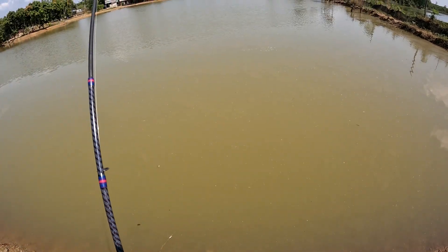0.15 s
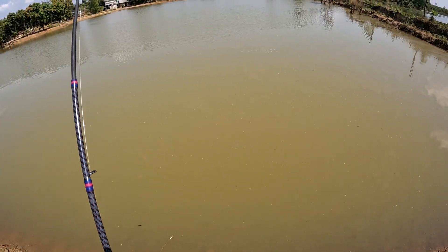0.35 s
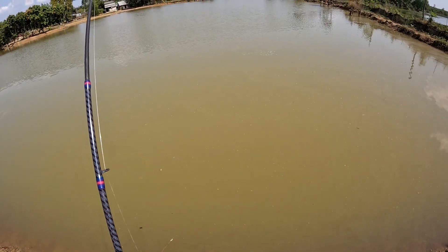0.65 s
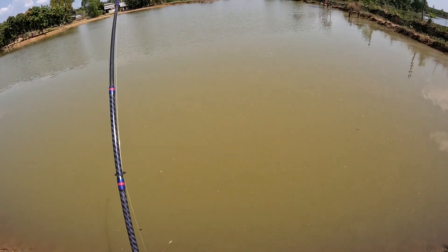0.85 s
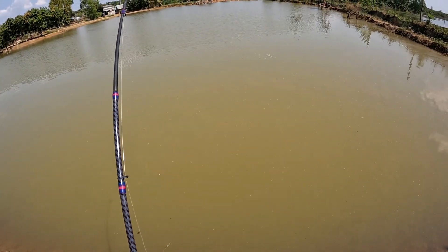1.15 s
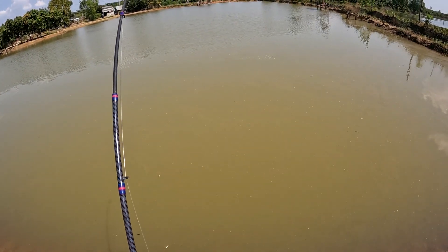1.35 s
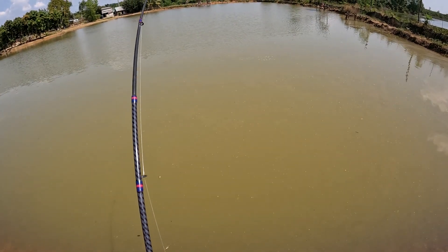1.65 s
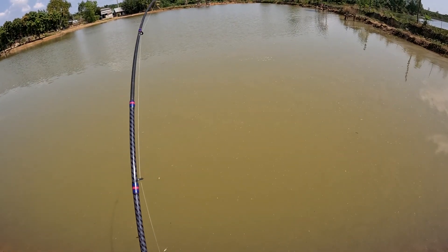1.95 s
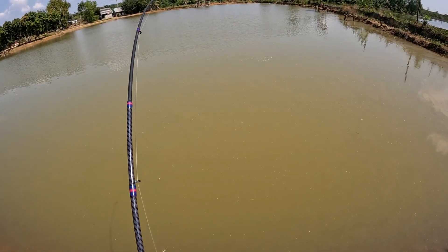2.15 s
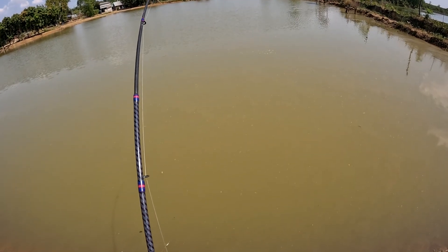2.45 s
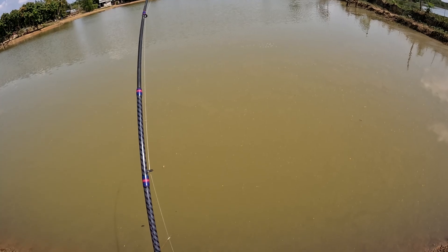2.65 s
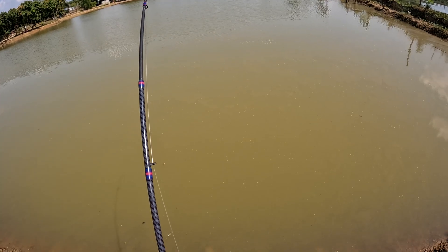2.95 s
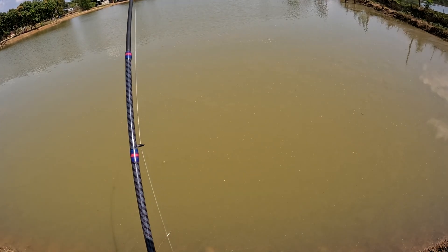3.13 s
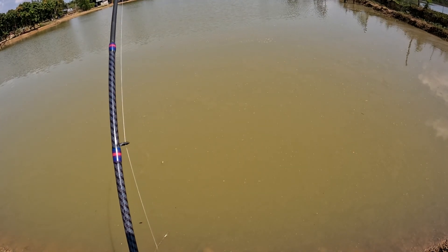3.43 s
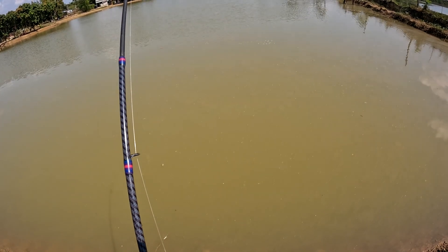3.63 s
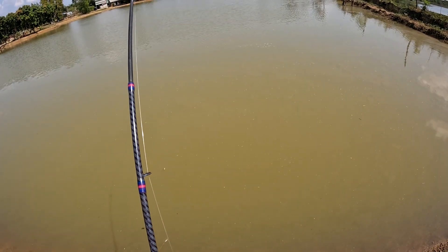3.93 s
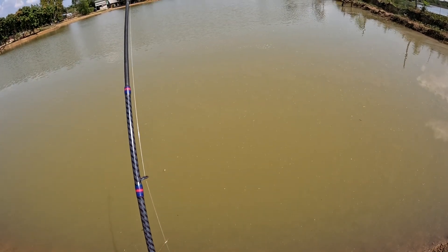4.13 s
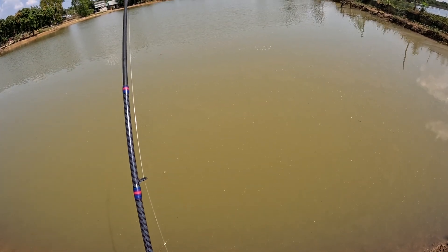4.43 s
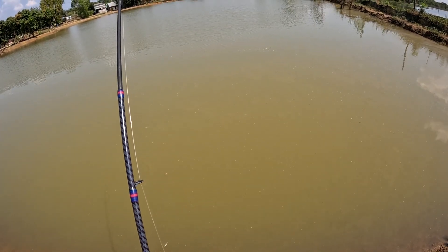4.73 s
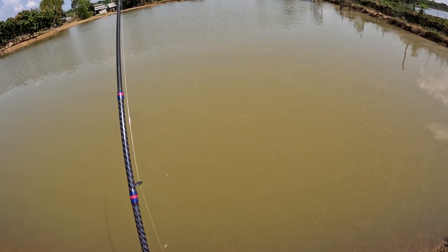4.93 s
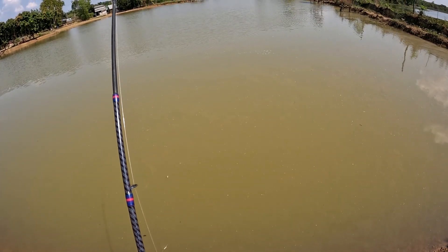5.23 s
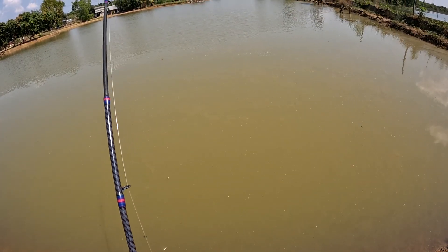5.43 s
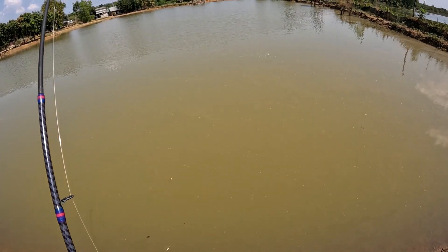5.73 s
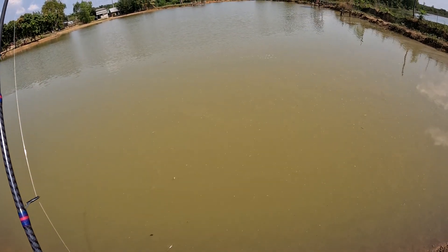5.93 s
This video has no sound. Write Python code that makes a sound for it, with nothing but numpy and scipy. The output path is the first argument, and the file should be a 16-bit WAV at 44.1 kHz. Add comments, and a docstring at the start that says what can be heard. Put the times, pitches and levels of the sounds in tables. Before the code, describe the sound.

Bright tinkling of a rod-tip bite bell, light knocks on the rod, sparse dry reel clicks, then low thudding wind over quiet outdoor hiss.

```python
"""By a still pond a rod is held close to two microphone ports. A pellet rattles in the little bite-alarm bell on
the rod: every blow restarts decaying shell modes under dry contact ticks. The reel's drag pawl snaps over a dozen
teeth and fittings knock on the blank, both as clicks through resonances. A breeze that grows to a gust buffets
the ports, as shaped noise and short pressure eddies, over a far hiss and one rub of the grip.
The stereo image opens slowly from near mono."""
import sys
import numpy as np
from scipy import signal
from scipy.io import wavfile
from scipy.ndimage import uniform_filter1d

SR = 44100
rng = np.random.default_rng(int(sys.argv[2]) if len(sys.argv) > 2 else 0)


def generate_wav(signal):
    """Clip the signal to [-1, 1] and save it as 16-bit WAV at the path in sys.argv[1]."""
    frames = np.transpose(np.atleast_2d(signal))
    scaled = np.clip(frames, -1, 1) * 32767
    pcm = np.round(scaled).astype(np.int16)
    wavfile.write(sys.argv[1], SR, pcm)


N = 268083


def amp(db):
    """Amplitude factor of a level in dB."""
    return 10 ** (np.asarray(db) / 20)


def evened(x):
    """Scales x to rms 1."""
    return x / np.sqrt(np.mean(x ** 2) + 1e-20)


def columns(rows):
    """Every column after the time, interpolated to one value a sample."""
    s, *values = np.transpose(rows)
    return [np.interp(np.arange(N) / SR, s, v) for v in values]


def sides(pan_db):
    """Left and right gain for a level gap; positive leans left."""
    return amp([pan_db / 2, -pan_db / 2])


def ring(x, modes):
    """Passes x through resonances of (f/Hz, width/Hz, level/dB), each applied twice for steep flanks."""
    out = 0
    for hz, width_hz, db in modes:
        pole = np.exp((2j * np.pi * hz - np.pi * width_hz) / SR)
        resonance = signal.lfilter([1], np.poly([pole, pole]), x).real
        out = out + amp(db) * (1 - abs(pole)) ** 2 * resonance
    return out


def struck(modes):
    """Reply of the resonances to one click, peak 1."""
    reply = ring(signal.unit_impulse(4096), modes)
    return reply / abs(reply).max()


def train(s, db):
    """Single-sample clicks of the given levels at the given moments."""
    out = np.zeros(N)
    at = np.minimum(np.round(np.asarray(s) * SR).astype(int), N - 1)
    np.add.at(out, at, amp(db))
    return out


def noise(spectrum, same, patchy_db, size):
    """Two-channel noise of rms 1 with drifting patches; same is the left-right likeness."""
    hz, frames = np.fft.rfftfreq(size, 1 / SR), 4 * N // size + 6
    a, b, c, d, patch = rng.standard_normal((frames, len(hz), 5)).T
    patch = uniform_filter1d(uniform_filter1d(patch, 9, axis=0), 7, axis=1)
    patch = evened(patch)
    f_hz, db = np.transpose(spectrum)
    spectrum_db = np.interp(np.log(hz + 1), np.log(f_hz), db)
    same = np.clip(same, 0, 1)
    left, other = a + 1j * b, c + 1j * d
    z = np.array([left, same * left + np.sqrt(1 - same ** 2) * other])
    z *= amp(spectrum_db[:, None] + patchy_db * patch)
    return evened(signal.istft(z, nperseg=size, noverlap=3 * size // 4)[1][:, :N])


def bell():
    """Each blow stops the old ring and starts a new one; between blows the pellet chatters ever more softly."""
    # shell modes of the main, lower and high family: f/Hz, level in family/dB, t60 before the settling/s
    shell = [
        [(4207, 1.5, 0.27), (4320, -15.5, 0.083), (4140, -8, 0.12)],
        [(3950, 4, 0.12), (3820, 5, .16), (7974, -19.5, 0.13)],
        [(9907, -2.5, 0.16), (9755, -8.5, 0.17), (14150, -11, 0.07)],
    ]
    # dry contact resonances: f/Hz, width of each pass/Hz, relative level/dB
    tick = [(4420, 1740, 31), (5500, 1000, -9.5), (8430, 5600, 3), (12600, 1200, -44)]
    # light-bounce resonances: f/Hz, width of each pass/Hz, relative level/dB
    jingle = [(4210, 39, 17.5), (3690, 430, 13.5), (4690, 1650, -0.5), (5500, 2090, -13.5), (9900, 40, -6)]
    # ring against blow strength as the bell turns and is gripped: t/s, two low families/dB, high family/dB
    ring_balance = [(0, -5, -44), (0.55, -11, -44), (0.87, -6.5, -29.5), (1.7, -8.5, -26), (2.3, -7, -20),
                    (2.9, -8, -19.5), (3.8, -11.5, -21.5), (4.2, -7, -22.5), (4.9, -14, -24),
                    (5.3, -18, -28), (5.7, -16, -34)]
    s, tick_db, lean_db, *chance = all_blows()
    main_share = 1 / (1 + amp(-2 * lean_db))  # of the power in the two low families
    balance_s, *balance_db = np.transpose(ring_balance)
    low_db, high_db = (tick_db + np.interp(s, balance_s, v) for v in balance_db)
    family_db = [low_db + 10 * np.log10(main_share), low_db + 10 * np.log10(1 - main_share), high_db]
    draws = np.reshape(chance, (3, 3, 3, -1))  # family, kind of chance, mode, blow
    t = np.arange(N) / SR
    last = np.maximum(np.searchsorted(s, t) - 1, 0)
    since = np.maximum(t - s[last], 0)
    contact = np.hanning(90) / np.hanning(90).sum()  # 2 ms hand-over between rings

    out = np.zeros((2, N))
    for modes, level_db, (phase, spot, load) in zip(shell, family_db, draws):
        for (hz, db, t60_s), p, q, r in zip(modes, phase, spot, load):
            fade = amp(-60 * since / t60_s - 1000 * since ** 2)  # settling pellet damps more and more
            # each blow lands on another spot
            start = amp(db + level_db + 14.9 * (q - .5)) * np.exp(2j * np.pi * 0.49 * p)
            detune = np.exp(2j * np.pi * hz * 0.013 * (r - .5)[last] * since)  # pellet loads the shell
            swing = signal.oaconvolve(start[last] * fade * detune, contact, "same")
            tone = (swing * np.exp(2j * np.pi * hz * t)).real
            out += sides(0.00062 * hz)[:, None] * tone

    bounce = (rng.random(N) < 1400 / SR) * rng.choice([-1, 1], N)  # 1400 a second on average
    rolling = amp(tick_db[last] - 21 - 380 * since) + amp(-84.5)  # never quite still
    chatter = bounce * rolling * amp(5.1 * np.minimum(rng.exponential(1, N), 4))
    skid = 0
    for late_s, db in ((0, -0.5), (.0008, -8), (.002, -18.5)):
        skid = skid + train(s + late_s * rng.random(len(s)), tick_db + db)
    scrape = amp(-10) * rolling * rng.standard_normal(N)  # fine spray of metal sliding on metal
    ticks = signal.oaconvolve(skid + scrape, struck(tick))[:N]
    ticks = ticks + signal.oaconvolve(chatter, struck(jingle))[:N]
    small = signal.cheby2(8, 40, 3450, "high", fs=SR, output="sos")  # too small to radiate lows
    return signal.sosfilt(small, out + sides(4.2)[:, None] * ticks)


def all_blows():
    """Clear blows, light random ones and rests in time order: moment, strength, lean and draws of chance."""
    # clear pellet blows: t/s, strength/dB, lean of the ring to the main family over the lower one/dB
    blows = [(0.0009, -35, 13), (0.042, -32, -17), (0.0573, -34.5, -12), (0.108, -31.5, 6),
             (0.1464, -30, 6), (0.1623, -31, 9), (0.199, -30, -21), (0.2223, -34.5, 13), (0.26, -40, -4),
             (0.3, -44.5, 26), (0.3843, -47, 9), (0.4126, -45.5, -4), (0.5125, -46, -13),
             (0.815, -48.5, 16), (0.8508, -38.5, 1), (0.8719, -27.5, 1), (0.8898, -35.5, -2),
             (0.905, -39, 10), (0.9418, -25, 30), (0.9894, -33.5, 16), (1.081, -37.5, 26),
             (1.107, -42.5, 14), (1.2225, -22, 0), (1.2356, -26.5, -1), (1.255, -34.5, -8),
             (1.377, -47.5, 25), (1.5064, -35.5, -3), (1.573, -46, -18), (1.655, -41, 6), (1.718, -31, 5),
             (1.7365, -36, 2), (1.8203, -38, -1), (1.8564, -31, 16), (1.8753, -34, 9), (1.9165, -29.5, 1),
             (1.942, -31.5, 1), (1.978, -33.5, -14), (1.9926, -27.5, 7), (2.043, -27.5, 8),
             (2.068, -35.5, -2), (2.112, -43.5, 18), (2.1715, -37.5, 8), (2.24, -35, 20), (2.333, -34, -2),
             (2.3822, -35, 4), (2.4323, -42.5, -3), (2.502, -37, 12), (2.646, -42, 18), (2.6867, -37, 18),
             (2.7236, -38, 14), (2.75, -31, -8), (2.784, -39.5, -3), (2.8214, -38, -8), (2.8366, -36, 20),
             (2.859, -37.5, 26), (2.8888, -46.5, 22), (3.029, -47, 18), (3.0494, -38.5, 3),
             (3.19, -44.5, 14), (3.223, -45.5, -2), (3.428, -42, -15), (3.815, -42.5, -3),
             (3.9288, -45, -14), (4.135, -23.5, -1.5), (4.1539, -27, -7), (4.1667, -18.5, 12),
             (4.1915, -33, 5), (4.2159, -25.5, 24), (4.2387, -30.5, 10), (4.2768, -21.5, -8),
             (4.309, -32, 19), (4.322, -28, 10), (4.353, -21, -3), (4.368, -28, -19), (4.3836, -30, 28),
             (4.42, -24, 7), (4.4347, -23.5, 18), (4.462, -26.5, 3), (4.476, -35, -12), (4.531, -35.5, 17),
             (4.7346, -36, 6), (4.8, -48, 8), (5.003, -46, -14), (5.1605, -52, -20), (5.308, -53.5, -17),
             (5.452, -46, 7), (5.5286, -41, -3), (5.6402, -45, -2), (5.6573, -47.5, 2)]
    # spells of shaking, filled with light blows: start/s, end/s, mean strength/dB
    shakes = [(0.06, 0.28, -39.5), (0.35, 0.46, -45), (0.76, 0.841, -50.5), (0.95, 1.02, -52.5),
              (1.42, 1.66, -59.5), (1.83, 2.1, -37.5), (2.18, 2.26, -39.5), (2.39, 2.52, -46.5),
              (2.61, 2.76, -51.5), (3.06, 3.95, -60), (4.05, 4.12, -54), (4.17, 4.498, -35),
              (4.74, 5.02, -53.5), (5.15, 5.33, -53), (5.44, 5.48, -46), (5.51, 5.56, -49),
              (5.58, 5.68, -48)]
    # the pellet lies down and stills the shell: t/s
    rest_times = [0.321, 0.972, 1.1545, 1.6895, 2.527]
    rest_db = -86  # what a resting pellet leaves
    light_per_s, flight_s = 60, .008  # no light blow within a flight of a clear one
    clear, count = np.array(blows), 400
    when, size, lean, keep = rng.random((count, 4)).T
    when = when * N / SR
    shake_db = np.full(count, -np.inf)
    for start, end, db in shakes:
        shake_db[(when > start) & (when < end)] = db
    flown = abs(when[:, None] - clear[:, 0]).min(axis=1) > flight_s
    kept = np.isfinite(shake_db) & flown & (keep < light_per_s * N / SR / count)
    # strength spreads +-6 dB, lean +-26 dB
    light = np.transpose([when, shake_db + 3.0 * (4 * size - 2), 13 * (4 * lean - 2)])
    rests = [(s, rest_db, 0) for s in rest_times]
    rows = np.vstack([light, clear, rests])
    rows = np.hstack([rows, rng.random((len(rows), 27))])
    rows = rows[np.r_[kept, np.ones(len(rows) - count, bool)]]
    return rows[np.argsort(rows[:, 0])].T


def drag():
    """The pawl slides off a tooth and lands: a thin bright snap, left port first, and a duller middle body."""
    # pawl snaps: start of the slide t/s, treble level/dB, body against the treble/dB
    snaps = [(4.4528, -22, -11), (4.472, -21, -10), (4.5183, -21, -8.5), (4.559, -23.5, -8),
             (4.6302, -23.5, -10), (5.0313, -25.5, -4.5), (5.0522, -27, -1), (5.2087, -26, -6.5),
             (5.231, -24, -7), (5.2572, -24.5, -6), (5.3484, -26, -3.5), (5.4364, -29.5, -3)]
    # treble resonances: f/Hz, width of each pass/Hz, relative level/dB
    pawl_treble = [(10230, 3300, 25), (12000, 2900, 16), (7870, 1800, 22), (15300, 530, -7)]
    # body resonances: f/Hz, width of each pass/Hz, relative level/dB
    pawl_body = [(4770, 1680, 12.5), (3620, 1100, 3), (2310, 240, 2.5)]
    s, db, body_db = np.transpose(snaps)
    slide_s = .0005
    # softer scrape, landing, rebound
    clicks = train(s + slide_s, db - 27) + train(s + 2 * slide_s, db) + train(s + 3.4 * slide_s, db - 38)
    treble = signal.oaconvolve(clicks, struck(pawl_treble))[:N]
    body = signal.oaconvolve(train(s + 2 * slide_s, db + body_db), struck(pawl_body))[:N]
    snap = np.array([treble, np.roll(treble, shift=1)])  # right port one sample later
    return sides(9.8)[:, None] * snap + sides(1.6)[:, None] * body


def knocks():
    """Short dead rings of the hollow blank, a second mode above and a crack on top."""
    # knocks on the rod: t/s, peak level before panning/dB, pitch f/Hz, bright crack/dB (9 dB taken off below)
    knock_rows = [(0.168, -44, 2300, -20), (0.2711, -39.5, 2970, 0), (0.8484, -35.5, 2180, 3),
                  (1.81, -46, 2850, -20), (3.0529, -31, 1910, -34), (3.5425, -47.5, 1390, -14),
                  (3.7602, -32.5, 2920, -22), (3.7806, -26.5, 3340, 2), (3.8826, -44, 3400, -7),
                  (3.9801, -43, 1265, -19), (4.244, -44.5, 1310, -26), (4.273, -39.5, 1140, -2.5),
                  (4.5353, -29, 1370, -26), (5.989, -39.5, 2360, -7)]
    out = np.zeros(N + SR)
    for s, db, hz, crack_db in knock_rows:
        at = round(s * SR)
        modes = [(hz, 0.29 * hz, 0), (1.463 * hz, 0.43 * hz, -6), (7000, 4000, crack_db - 9)]
        out[at:at + 4096] += amp(db) * struck(modes)
    return sides(4.2)[:, None] * out[:N]


def wind():
    """Slow rumble, lumpy flutter and buffets of turbulent pressure; the gust falls harder on the right port."""
    # wind on the ports, before panning: t/s, rumble level/dB, flutter level/dB
    wind_levels = [(0, -43.5, -55), (1.1, -45, -55.5), (2.3, -40, -55), (2.7, -47, -54.5),
                   (3.1, -34.5, -52), (3.55, -46.5, -55), (4.2, -38.5, -54.5), (4.75, -45, -52.5),
                   (4.95, -41, -54.5), (5.1, -22.5, -43), (5.19, -33, -46), (5.33, -29, -47),
                   (5.6, -24.5, -43.5), (5.72, -24.5, -37.5), (5.79, -16.5, -22.5), (5.88, -29, -23),
                   (6.0, -19, -20.5), (6.08, -30, -22.5)]
    # single buffets: t/s, level/dB (5 dB taken off below), pitch f/Hz, sharp edge/dB
    buffets = [(5.102, -16.5, 88, -40), (5.241, -7, 83.6, -62), (5.304, -24, 89, -60),
               (5.36, -25.5, 99.5, -60), (5.439, -20.5, 105, -71), (5.505, -24, 104.4, -60),
               (5.56, -17, 122.6, -63), (5.641, -26.5, 137, -65), (5.675, -16.5, 147, -66),
               (5.707, -12.5, 155.3, -65), (5.76, -10.5, 168.6, -56), (5.824, -7.5, 140, -10),
               (5.884, -8.5, 147.7, -24), (5.92, -20, 136, -32), (5.986, -9.5, 227, -39.5),
               (6.008, -7.5, 161, -19.5), (6.044, -7, 230, -26.5)]
    # rumble spectrum: f/Hz, relative level/dB per Hz
    rumble = [(12, 7.5), (22, 13), (45, 3.5), (80, -4.5), (140, -49), (400, -100)]
    # calm flutter spectrum: f/Hz, relative level/dB per Hz
    flutter = [(50, -6.5), (90, 3), (180, -4), (320, -14), (480, -27.5), (1500, -100)]
    # gust flutter spectrum: f/Hz, relative level/dB per Hz
    gust_flutter = [(60, -23.5), (100, 1.5), (160, 3.5), (250, -13.5), (420, -36), (1200, -100)]
    port_lag_s = .00027  # a buffet reaches the right port later
    rumble_db, flutter_db = columns(wind_levels)
    gust = np.clip((flutter_db + 55.5) / 12, 0, 1)  # 0 calm, 1 full gust
    out = 0
    # in the gust the ports' rumble is less alike, their flutter more
    for soft, hard, db, pan_db, same in ((rumble, rumble, rumble_db, -4, .75),
                                         (flutter, gust_flutter, flutter_db, -8, .93)):
        calm = noise(soft, 0.86, 2.3, size=2048)
        gusty = noise(hard, same, 3.63, size=2048)
        mix = np.sqrt(1 - gust) * calm + np.sqrt(gust) * gusty
        out = out + sides(pan_db * (.3 + 0.63 * gust)) * amp(db) * mix

    puffs = np.zeros((2, N + SR))
    for s, db, hz, edge_db in buffets:
        # smaller eddies ride on the crest and give the edge: pitch ratio, delay/cycles, level/dB, pan/dB
        for ratio, late, size_db, pan_db in ((1, 0, 0, -7), (2.1, 0, 0.38 * edge_db, -10),
                                             (3.6, 1.24, edge_db, -10), (5.6, 2.3, edge_db - 21, -3.5)):
            part = amp(db - 5.0 + size_db) * sides(pan_db)[:, None] * eddy(ratio * hz, 1.146)
            puffs[:, round((s + late / hz) * SR):][:, :part.shape[1]] += part
    lagged = np.roll(puffs[1], round(port_lag_s * SR))
    return out + np.array([puffs[0], lagged])[:, :N]


def eddy(hz, turns_to_peak):
    """A few swelling and dying cycles of pressure."""
    turns = np.arange(0, 7 * turns_to_peak, hz / SR)
    envelope = (turns / turns_to_peak * np.exp(1 - turns / turns_to_peak)) ** 2
    return envelope * np.sin(2 * np.pi * turns)


def air():
    """Far hiss of the open pond with its faint swells, and the hand's brief rub, all as shaped noise."""
    # far outdoor hiss spectrum: f/Hz, relative level/dB per Hz
    hiss = [(250, -51.5), (500, -9.5), (900, -9), (1290, -4.5), (1900, -11.5), (3200, -12.5), (4500, -17.5),
            (7500, -22.5), (9000, -27.5), (12500, -64)]
    # grip resonances: f/Hz, width of each pass/Hz, relative level/dB
    grip = [(305, 45, 11), (714, 180, 5.5), (1550, 390, 4.5), (2850, 1800, -5.5)]
    # faint bands, mostly sinking: start/s, length/s, first f/Hz, last f/Hz, width setting/Hz, level before arch/dB
    swells = [(0.0, 0.25, 1156, 1126, 90, -67), (0.198, 0.91, 1348, 1190, 112, -67),
              (1.299, 0.45, 1306, 1305, 150, -70.5), (1.35, 0.11, 1500, 1503, 2500, -66),
              (1.495, 0.12, 1720, 1690, 70, -70), (1.741, 0.3, 1346, 1220, 130, -64.5),
              (1.798, 0.098, 1660, 1720, 80, -65.5), (2.168, 0.2, 1724, 1800, 150, -72),
              (2.902, 0.74, 1352, 1249, 405, -69.5), (4.901, 0.42, 1500, 1396, 1200, -68.5),
              (5.62, 0.15, 1294, 1265, 70, -66), (5.582, 0.22, 696, 717, 50, -70.5),
              (5.8, 0.08, 3200, 3000, 3000, -68), (5.96, 0.11, 3000, 2600, 3000, -62)]
    rub_s, rub_rise_s, rub_fall_s, rub_db = 4.656, 0.13, 0.078, -51.5  # a hand slides on the grip
    late_s = np.arange(N) / SR - rub_s
    stroke = np.clip(1 + np.minimum(late_s / rub_rise_s, -late_s / rub_fall_s), 0, 1)
    out = amp(rub_db) * stroke * evened(ring(rng.standard_normal(N), grip))
    for row in swells:
        part = swell(*row)
        out[round(row[0] * SR):][:len(part)] += part
    return amp(-65) * noise(hiss, 0.37, 2.5, size=512) + out


def swell(start, length, first_hz, last_hz, width_hz, db):
    """Noise through a gliding resonance under one smooth arch."""
    u = np.arange(0, 1, 1 / (length * SR))
    turn = np.cumsum(first_hz + (last_hz - first_hz) * u) / SR
    slow = ring(rng.standard_normal((2, len(u))), [(0, width_hz, 0)])
    band = slow[0] * np.cos(2 * np.pi * turn) + slow[1] * np.sin(2 * np.pi * turn)
    return amp(db) * np.sin(np.pi * u) * evened(band)


def body_echo(x):
    """Sparse reflections from the angler's hands and chest, gone in a few hundredths of a second."""
    fade = amp(-60 * np.arange(3000) / SR / 0.063)  # t60 63 ms
    taps = rng.standard_normal((2, 3000)) * (rng.random((2, 3000)) < .1) * fade
    return signal.oaconvolve(x, taps / np.linalg.norm(taps[0]), axes=1)[:, :N]


def scene():
    """Bell, drag and knocks with their body echoes, over wind and air."""
    hard = drag() + knocks()
    small = bell()
    near = small + amp(-17.5) * body_echo(small) + hard + amp(-9) * body_echo(hard)
    return near + wind() + air()


def record(dry):
    """The stereo image opens; the amplifier rounds off the hardest buffets; then the band limit."""
    open_from_s, open_by_s = 0.62, 4.83
    shut, shut_treble, treble_hz = 0.024, 0.51, 6140  # side gains at the start: treble part open
    mid, side = (dry[0] + dry[1]) / 2, (dry[0] - dry[1]) / 2
    low = signal.oaconvolve(side, signal.firwin(101, treble_hz, fs=SR), "same")
    opened = np.clip((np.arange(N) / SR - open_from_s) / (open_by_s - open_from_s), 0, 1)
    treble = (side - low) * (shut_treble + (1 - shut_treble) * opened)
    side = low * (shut + (1 - shut) * opened) + treble
    ceiling = 0.59
    rounded = ceiling * np.tanh(np.array([mid + side, mid - side]) / ceiling)
    rounded = np.pad(rounded, ((0, 0), (512, 512)), "edge")
    band_limit = signal.firwin(1023, 16700, window=("kaiser", 12), fs=SR)
    return signal.oaconvolve(rounded, band_limit[None], "same")[:, 512:-512]


dry = scene()
out = record(dry)
generate_wav(out)
```